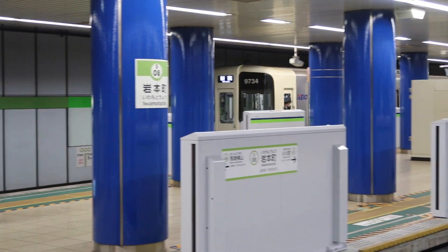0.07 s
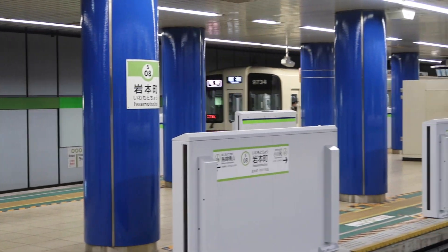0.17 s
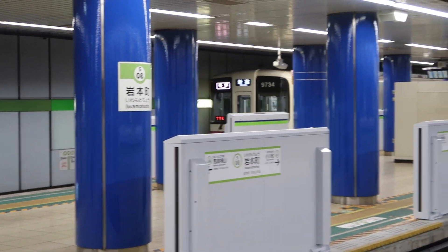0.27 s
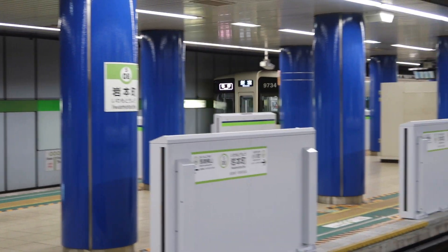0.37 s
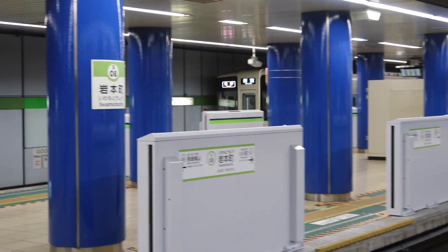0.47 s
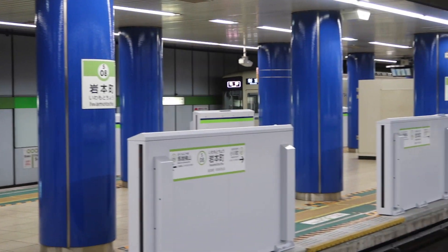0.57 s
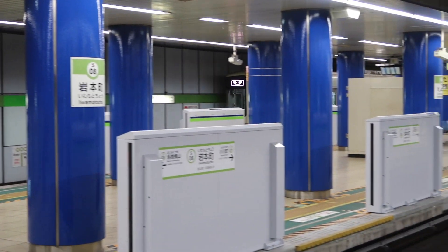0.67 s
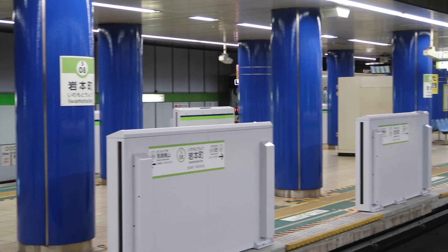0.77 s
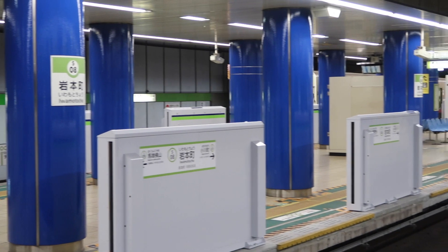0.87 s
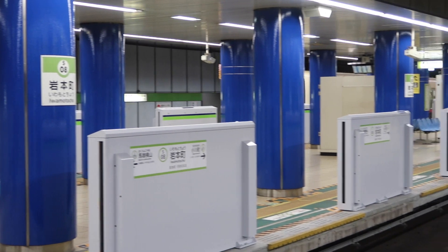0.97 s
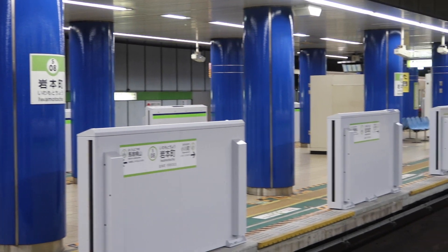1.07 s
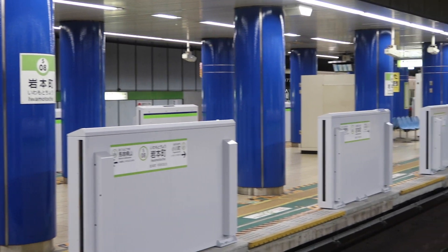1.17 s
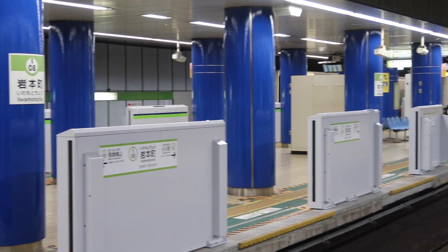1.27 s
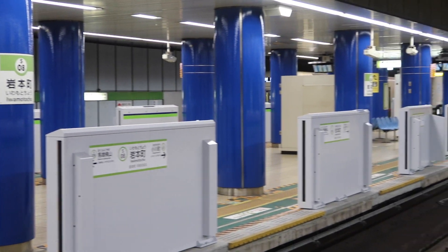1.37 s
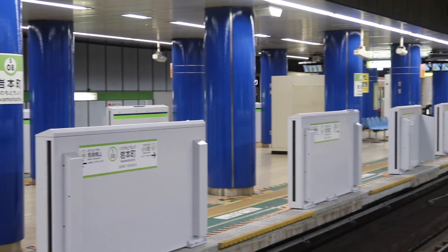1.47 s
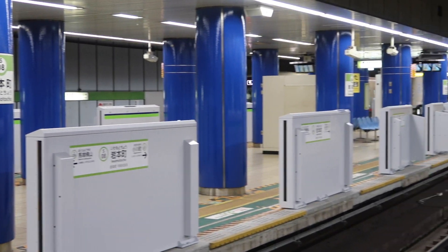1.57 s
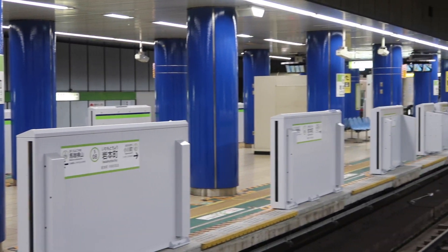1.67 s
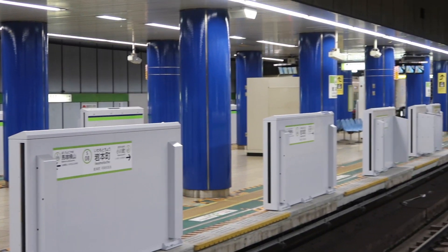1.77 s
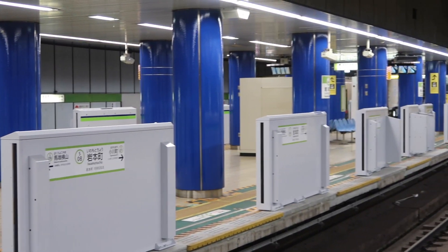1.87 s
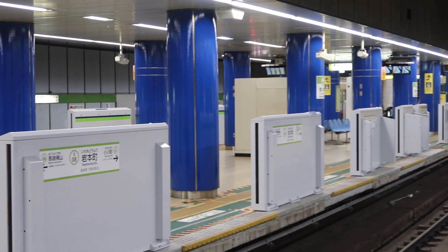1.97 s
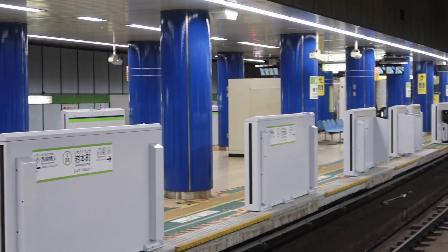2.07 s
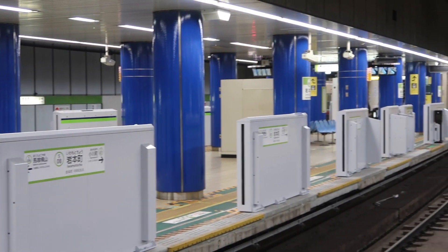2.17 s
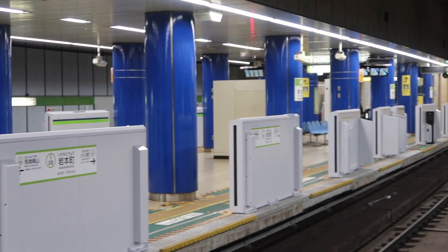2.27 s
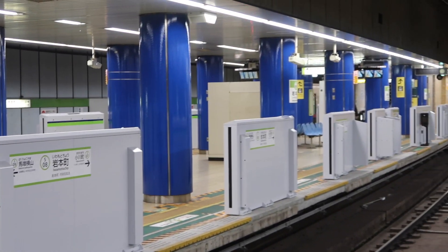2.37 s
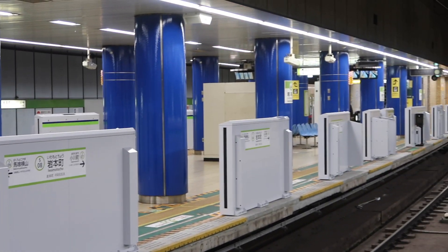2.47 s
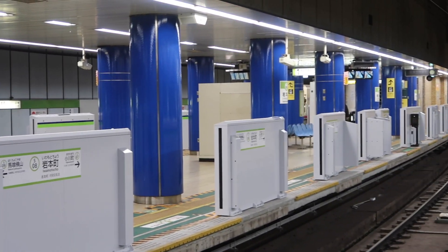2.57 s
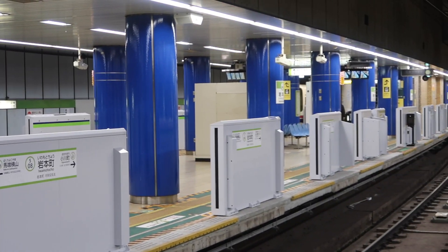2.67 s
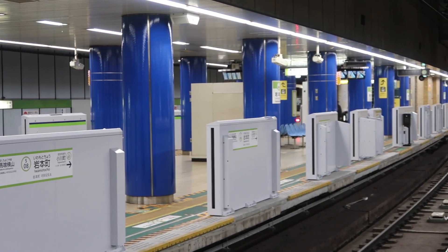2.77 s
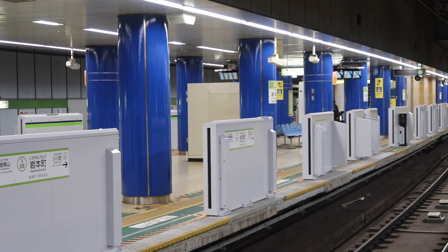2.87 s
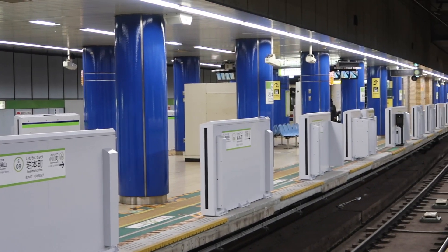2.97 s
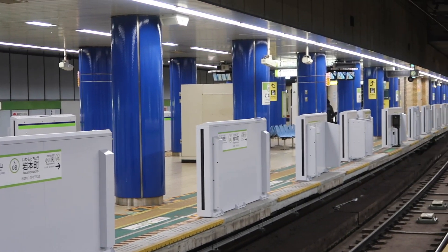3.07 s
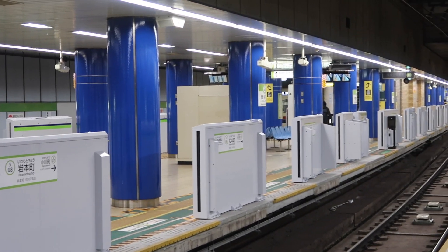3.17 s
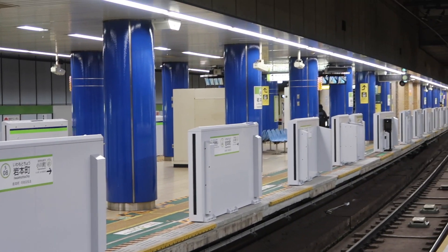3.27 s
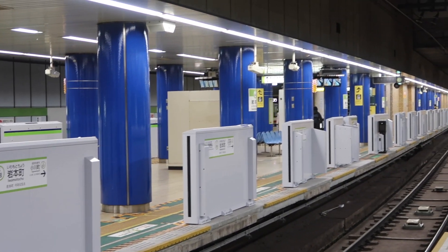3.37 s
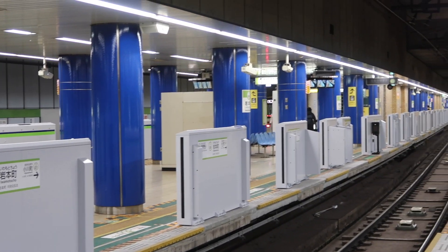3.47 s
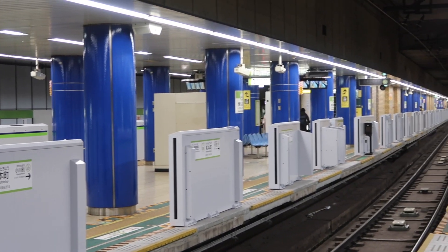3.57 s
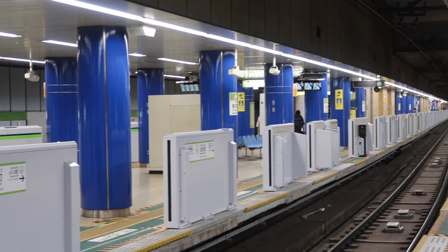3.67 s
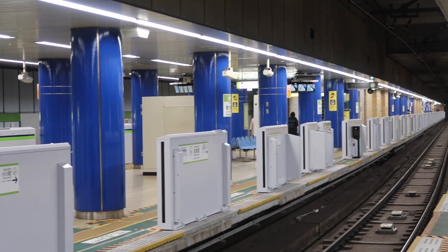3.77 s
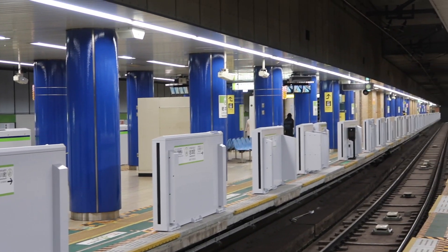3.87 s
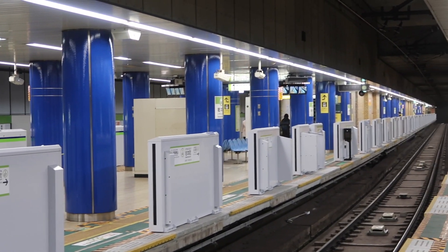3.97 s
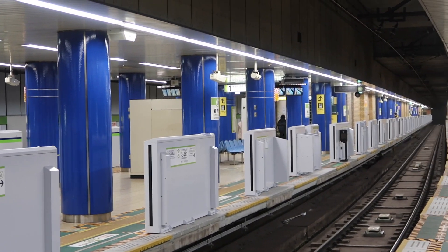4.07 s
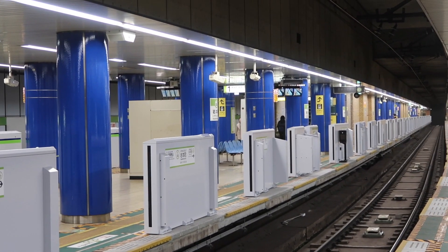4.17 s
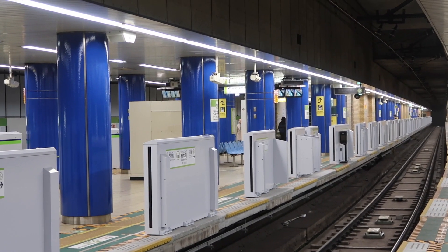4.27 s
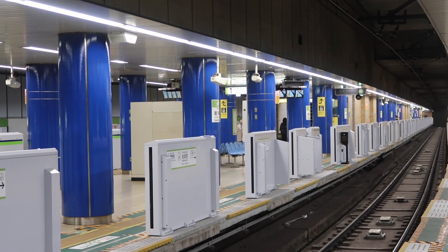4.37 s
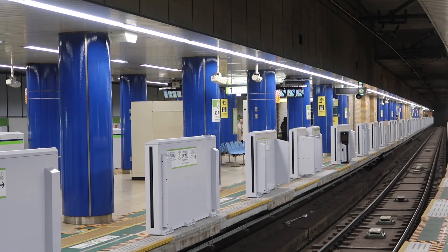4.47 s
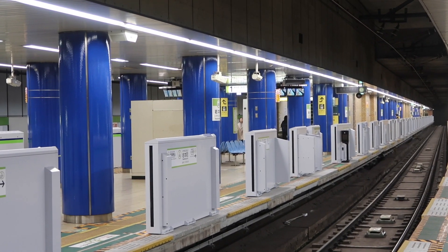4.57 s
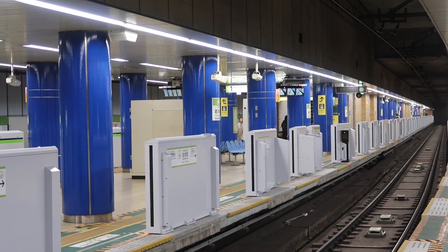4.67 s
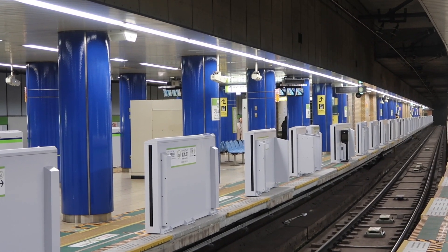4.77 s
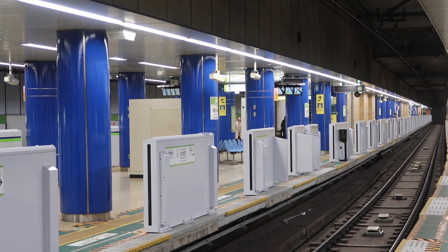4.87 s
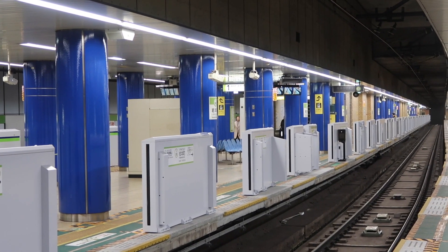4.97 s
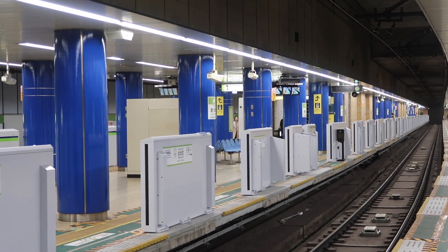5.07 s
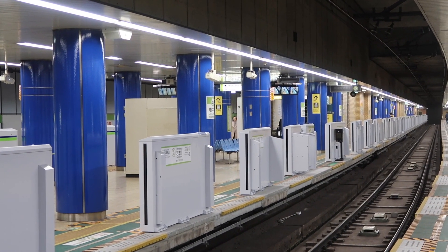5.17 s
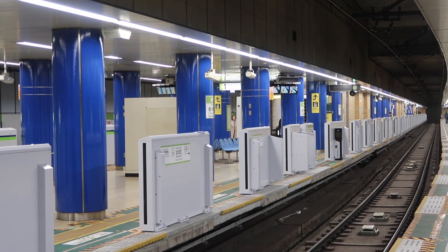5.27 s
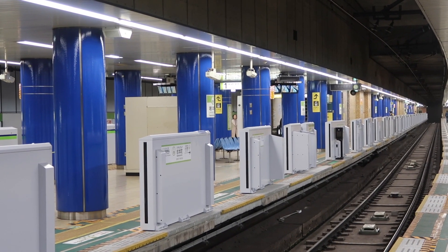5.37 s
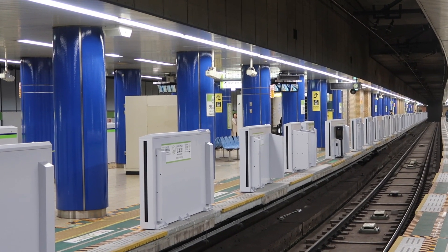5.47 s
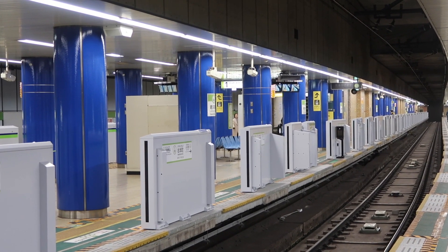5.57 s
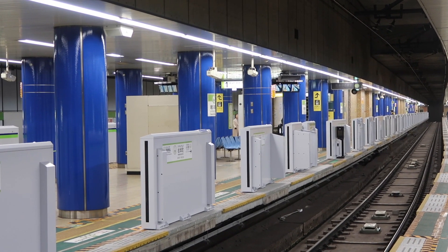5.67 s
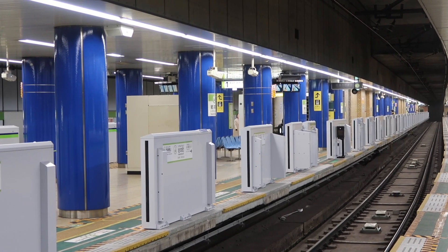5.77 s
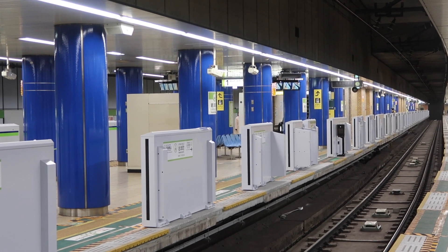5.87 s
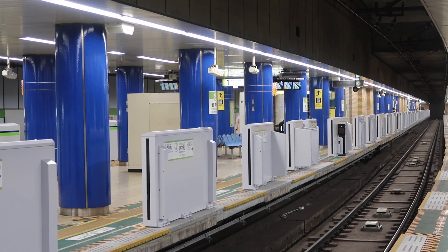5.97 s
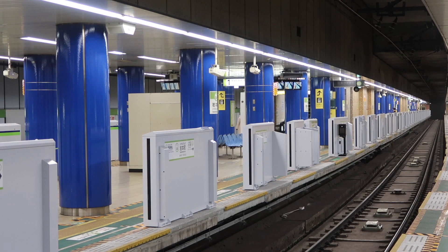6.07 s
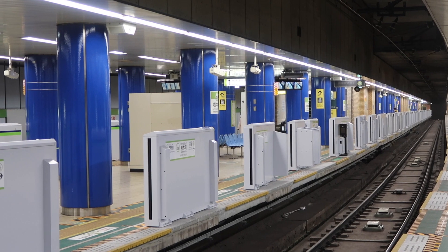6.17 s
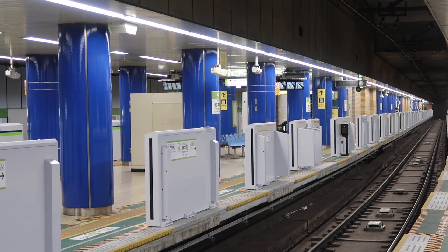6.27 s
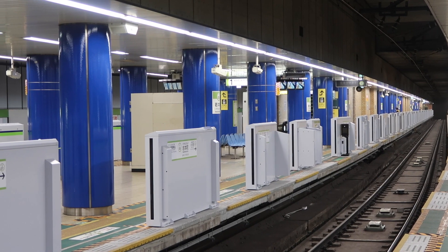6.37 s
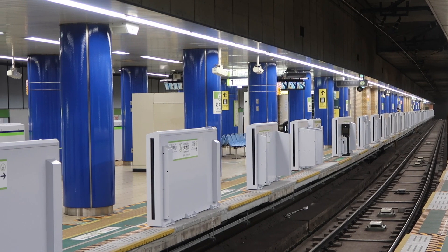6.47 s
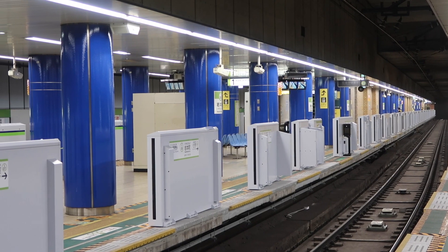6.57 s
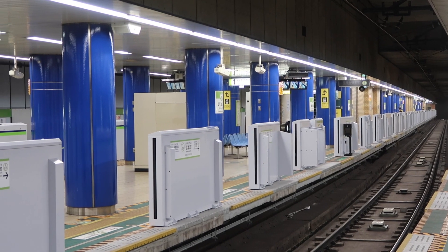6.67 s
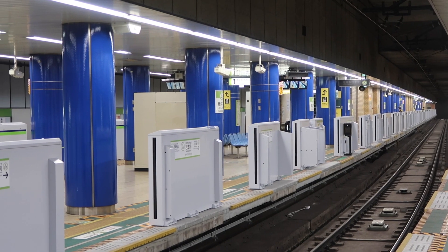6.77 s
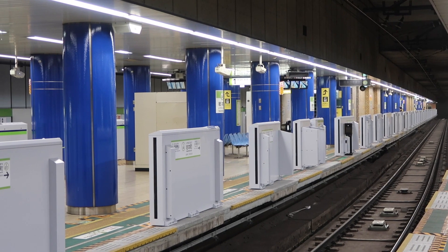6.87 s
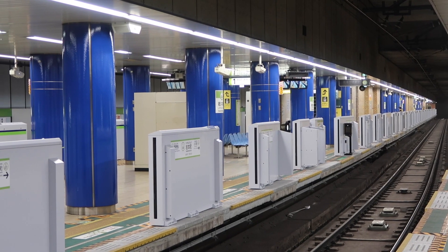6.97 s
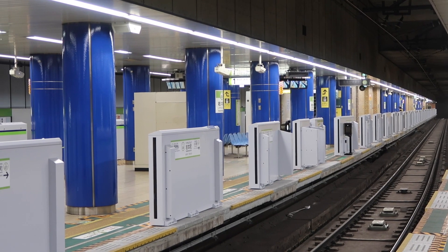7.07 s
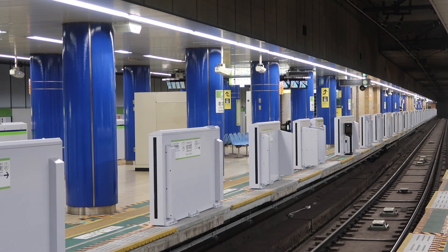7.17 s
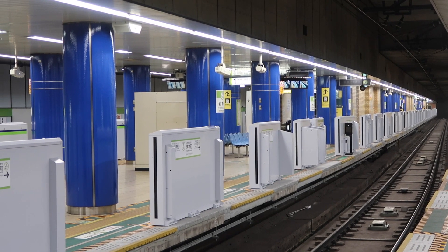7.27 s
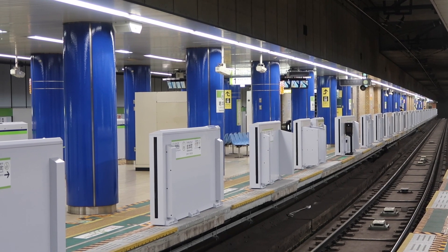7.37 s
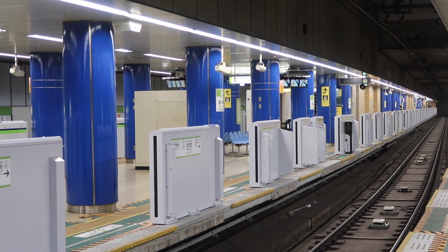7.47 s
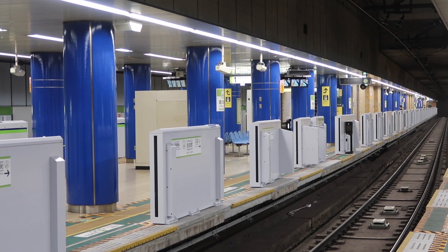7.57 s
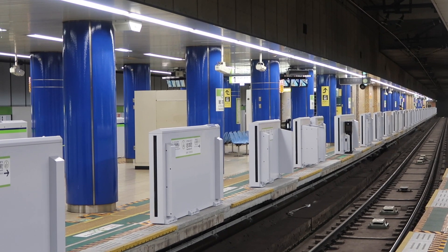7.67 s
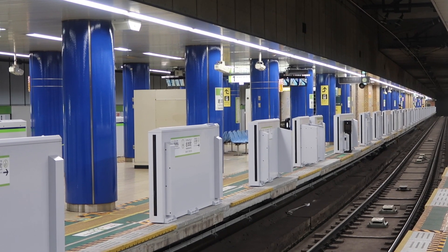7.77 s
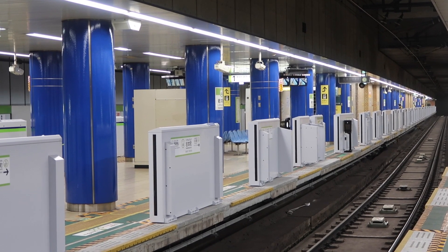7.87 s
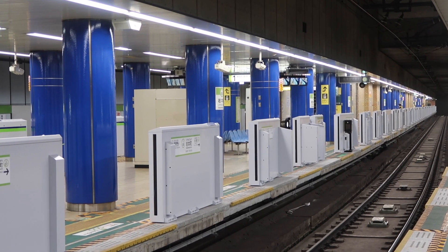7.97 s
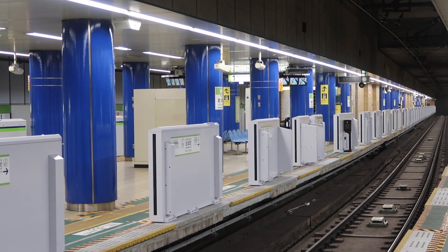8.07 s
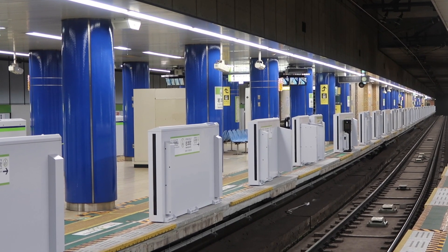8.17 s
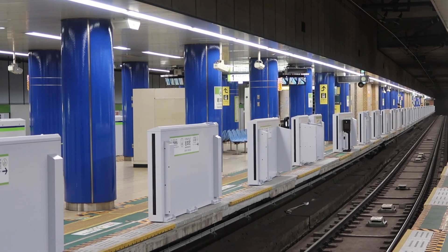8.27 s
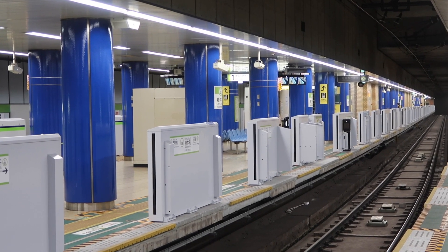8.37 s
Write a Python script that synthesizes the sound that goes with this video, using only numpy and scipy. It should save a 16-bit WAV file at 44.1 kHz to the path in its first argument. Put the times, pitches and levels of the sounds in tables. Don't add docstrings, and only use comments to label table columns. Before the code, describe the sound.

Departing subway train rumbles and roars past joints, a sweeping electrical howl dies away, and rising motor whine recedes into echoing distance.

```python
import sys
import numpy as np
from scipy import signal
from scipy.fft import rfft, irfft, next_fast_len
from scipy.io import wavfile
from scipy.ndimage import uniform_filter1d

SR = 44100
rng = np.random.default_rng(int(sys.argv[2]) if len(sys.argv) > 2 else 0)


def how_loud(loudness_db):
    steps = np.asarray(loudness_db, float) / 20
    return 10 ** steps


def put_to_file(sound):
    columns = np.atleast_2d(sound).T
    safe = np.clip(columns, -1, 1)
    whole_steps = np.round(safe * 32767)
    wavfile.write(sys.argv[1], SR, whole_steps.astype(np.int16))


N = 370881
TIME = np.arange(N) / SR


def unit(x):
    return x / np.sqrt(np.mean(np.abs(x[0]) ** 2) + 1e-20)


def along(points, hz):
    f, v = np.transpose(points)
    return np.interp(np.log(hz + 1), np.log(f + 1), v)


def curves(rows):
    s, *cols = np.transpose(rows)
    return [np.interp(TIME, s, c) for c in cols]


def ramp(start_s, length_s):
    return np.clip((TIME - start_s) / length_s, 0, 1)


def filtered(x, response):
    m = next_fast_len(N + 8192)
    return irfft(rfft(x, m) * response(np.fft.rfftfreq(m, 1 / SR)), m)[..., :N]


def rush(response, patchy_db):
    z = signal.stft(rng.standard_normal((2, N)), nperseg=512)[2]
    field = uniform_filter1d(rng.standard_normal(z.shape[1:]), size=5, axis=0)
    field = uniform_filter1d(field, size=12, axis=1)
    pair = signal.istft(z * how_loud(patchy_db * field / field.std()), nperseg=512)[1][:, :N]
    return unit(filtered(pair, response))


def coloured(spectrum, patchy_db):
    return rush(lambda f: how_loud(along(spectrum, f)), patchy_db)


def flutter(blur_hz):
    knots = rng.standard_normal((4, 9000))
    z = np.array([np.interp(TIME * blur_hz, np.arange(len(k)), k) for k in knots])
    return unit(z[:2] + 1j * z[2:])


def blurred(hz, db, blur_hz, steady=0):
    wobble = np.sqrt(1 - steady) * flutter(blur_hz) + np.sqrt(steady)
    tone = np.exp(2j * np.pi * np.cumsum(hz + 0 * TIME) / SR)
    return how_loud(db) * np.sqrt(2) * np.real(wobble * tone)


def tunnel(pair, t60, wet):
    t = TIME[:SR]
    tail = rng.standard_normal((2, len(t))) * how_loud(-60 * t / t60)
    fade_in = np.sin(np.pi / 2 * ramp(0, .02)) ** 2
    echo = signal.fftconvolve(pair * fade_in, tail / np.linalg.norm(tail[0]), axes=1)[:, :N]
    return np.sqrt(1 - wet) * pair + np.sqrt(wet) * echo


def receding():
    # start_s, loudness_db, motor_pull_db
    train = [(0, -20, -9), (.35, -22.5, -7.5), (.5, -22, -4.5), (.7, -23.5, -1.5), (1.4, -24, -2.5),
             (1.8, -24.5, -0.6), (2.2, -25.5, 1), (2.5, -26, 2), (2.8, -26.5, 5.5), (3, -26.5, 2.5),
             (3.25, -27, 3), (3.5, -26.5, 0.5), (3.8, -26.5, -1), (4.2, -27.5, -1.5), (4.7, -29, 1),
             (5.3, -29.5, 0.5), (5.8, -30, 1.4), (6.1, -30, 0.5), (6.4, -31, 4), (6.65, -28.5, -2),
             (6.9, -30.5, -0.5), (7.4, -30.5, -2), (8, -32, -5), (8.41, -32, -1)]
    loud_db, pull_db = curves(train)
    return loud_db - loud_db[0], pull_db


def joint_swells():
    # middle_s, rumble_lift_db, body_lift_db
    joints = [(0.229, 1, 3.5), (.45, 2.5, 4.5), (.8, 6, 4), (1.17, 4.5, 4.5), (1.65, 2, -2.5),
              (2.04, 1.5, -1.5), (2.3, 0.5, -3), (2.661, 1.5, 4), (2.981, 4.5, 4), (3.3, 3.5, 1),
              (3.82, 0.5, -10), (4.2, 0.5, -2.5), (4.901, 4, 1.5), (5.298, 2, -4.5), (5.85, 3, -0.5),
              (6.3, 3.5, -3), (6.7, -1.5, 3.5), (7.45, 3.5, -3), (8.17, 4.5, -2.5)]
    t = TIME[::100]
    swell_s = 0.2
    swells_db = sum(np.outer(lifts_db, np.exp(-((t - s) / swell_s) ** 2)) for s, *lifts_db in joints)
    return curves(np.column_stack([t, *swells_db]))


def station():
    # pitch_hz, level_db
    vent = [(8, -120), (16, -34), (25, -17), (32, -13), (42, -3), (55, 0), (70, -4), (110, -25),
            (200, -120)]
    return how_loud(-42) * coloured(vent, patchy_db=.5)


def case_tick(peak_db):
    # pitch_hz, level_db, decay_s (time to fall 60 dB)
    case = [(2800, 3, .02), (3500, 2, .02), (4100, 0, .016), (4700, -1, .016), (5700, -4, .012),
            (7000, 0, .012), (8500, 3, .01), (11500, -3, .01), (13800, -24, .008)]
    t = TIME[:SR // 20]
    ring = sum(how_loud(db - 60 * t / t60) * np.sin(2 * np.pi * hz * t) for hz, db, t60 in case)
    ring = ring * (1 - np.exp(-t / .001))
    noise = uniform_filter1d(rng.standard_normal(len(t) + 1), size=4)
    noise = np.diff(uniform_filter1d(noise, size=3))
    ring = ring + how_loud(12 - 60 * t / .06) * noise
    return how_loud([[peak_db - 7], [peak_db - 13]]) * ring


def camera():
    # pitch_hz, level_db
    capsule = [(1200, -120), (2500, -19.5), (4500, -3), (6000, -4.5), (8000, -7.5), (9500, -7), (10500, -8),
               (11400, -9), (12300, -13), (13500, -21), (14500, -22), (16000, -120)]
    # pitch_hz, level_db
    capsule_apart = [(1200, -120), (2500, -18.5), (4500, -5), (7000, -7), (9000, -3), (10800, -4),
                     (12200, -3.5), (13500, -16.5), (14500, -15), (16000, -120)]
    # pitch_hz, level_db
    whistle = [(13006, -88)]
    # start_s, peak_db
    tick = [
        (7.734, -38),
    ]
    common = how_loud(-70) * coloured(capsule, patchy_db=.5)[0]
    apart = how_loud(-69) * coloured(capsule_apart, patchy_db=.5)[0]
    gain_creep_db = 4 * (ramp(.5, 4) - .7)
    out = np.array([common + apart, common - apart]) * how_loud(gain_creep_db)
    for hz, db in whistle:
        out += blurred(hz, db, blur_hz=25)[0]
    for s, db in tick:
        sound = case_tick(db)
        start = round(s * SR)
        out[:, start:start + sound.shape[1]] += sound
    return out


def air_puff():
    start_s, rise_s, hold_s, fall_s = 6.4, .08, .13, .3
    blow = ramp(start_s, rise_s) - ramp(start_s + rise_s + hold_s, fall_s)
    return how_loud(-60) * blow * rush(lambda f: np.exp(-np.log(f / 3000 + 1e-6) ** 2 / .5), patchy_db=1)


def low_rumble():
    # pitch_hz, level_db
    rumble = [(13, -45), (22, -24), (81, 2.5), (99, -1), (135, -11.5), (180, -44), (300, -120)]
    # pitch_hz, level_db
    body = [(50, -120), (90, -21), (120, 15), (140, 13.5), (175, 2.5), (230, -3), (290, -48), (480, -120)]
    away_db = receding()[0]
    rumble_lift_db, body_lift_db = joint_swells()
    out = how_loud(-24.5 + away_db + rumble_lift_db) * coloured(rumble, patchy_db=-1.0)
    out += how_loud(-29.5 + 0.74 * away_db + body_lift_db) * coloured(body, patchy_db=-1.5)
    return out + blurred(92.4, -21 + 2.4 * away_db + rumble_lift_db, blur_hz=30.13)


def rolling_roar():
    # pitch_hz, level_db
    roar = [(88, -28), (150, -5.5), (195, -5), (298, -3), (386, -2.5), (592, -4.5), (1020, -8),
            (1360, -18.5), (1640, -21), (1800, -25.5), (2340, -52), (3960, -120)]
    # pitch_hz, level_db
    hiss = [(500, -120), (900, -37), (1380, -0.5), (1650, -6), (2000, -7), (2400, -10), (3000, -15),
            (4000, -23.5), (5000, -32), (6000, -38), (8000, -46.5), (14000, -120)]
    away_db = receding()[0]
    hiss_noise = coloured(hiss, patchy_db=1.7)
    sheen = filtered(hiss_noise[:, ::-1], lambda f: 1 / (1 + (2570 / (f + 1)) ** 4))
    out = how_loud(-20 + 0.87 * away_db) * coloured(roar, patchy_db=0.85)
    out += how_loud(-35 + away_db) * hiss_noise
    out += how_loud(-35 + 1.8 * away_db) * sheen
    return out + blurred(1966, -45.5 + 0.41 * away_db, blur_hz=328)


def step_ring():
    # pitch_hz, width_hz, level_db
    resonances = [(1329, 130, 0.5), (1410, 110, -6)]
    start_s, rise_s, hold_s = 0.38, 0.075, 0.94
    step, end_s = ramp(start_s, rise_s), start_s + hold_s
    ring = rush(lambda f: sum(how_loud(db) / (1 + ((f - hz) / width * 2) ** 4) for hz, width, db in resonances),
                patchy_db=-0.2)
    ring_db = -33 - 6.5 * ramp(end_s, 0.6) - 2 * np.maximum(TIME - end_s, 0)
    moan = blurred(992, -33, blur_hz=217.3)
    return step * how_loud(ring_db) * ring + (1 - step) * moan


def rising_howl():
    climb_hz_per_s, sweep_s = 1020, 1.1
    hz = 1902 + climb_hz_per_s * np.minimum(TIME, sweep_s + 0.55 * (TIME - sweep_s))
    low_db = -40 - 3 * TIME - 24.5 * np.maximum(TIME - sweep_s + 0.11, 0)
    high_db = -40 - 3.5 - 34 * np.maximum(TIME - .3, 0)
    howl = blurred(hz, low_db, blur_hz=638)
    howl += blurred(hz + 1163 - 150 * TIME, high_db, blur_hz=553)
    settled_hz = 3152 - 130 * np.minimum(TIME, 4)
    return howl + ramp(0.87, .4) * blurred(settled_hz, -45 - 2.5 * TIME, blur_hz=898)


def motor_whines():
    # multiple of the mesh rate, blur_hz, start_level_db, fade (dB lost per dB of loudness lost)
    whines = [(.884, 34.01, -34.5, 0.85), (1, 42.03, -30.5, 1.0), (1.12, 90.07, -25, 3.5),
              (1.275, 40.04, -33.5, 0.96), (1.993, 50.44, -46.5, 1.45), (2.36, 59.7, -31.5, 2.5),
              (2.655, 80, -26, 2.5), (3.32, 90.14, -38, 1.2)]
    # pitch_hz, width_hz, lift_db
    passage = [(273.2, 27.6, 11), (312.5, 5.9, 4), (389, 46, 10), (352, 21, 5.5), (433.7, 40, 3.5),
               (465, 35, -7), (522, 54, 11.5), (626, 60, 9), (678, 45, 7.5), (752, 70, 9), (821, 80, -11.5),
               (847, 99, 8), (977, 44, 6), (1075, 110, 3), (1140, 65, 12)]
    mesh_hz = 239.1 + 24.6 * TIME - .24 * TIME ** 2
    away_db, pull_db = receding()
    out = 0
    for multiple, blur_hz, db, fade in whines:
        out = out + blurred(multiple * mesh_hz, db + fade * away_db + pull_db, blur_hz, steady=.1)

    def lift(f):
        lift_db = sum(db / (1 + ((f - hz) / width * 2) ** 2) for hz, width, db in passage)
        return how_loud(lift_db) / (1 + (f / 1270) ** 20)

    return filtered(out, lift)


def scene():
    # pitch_hz, side_minus_mid_db
    apart = [(40, -48), (96, -52.5), (150, -34), (240, -25.5), (390, -19.5), (620, -20), (980, -18),
             (1570, -13.5), (2500, -9.5), (4000, -3), (7000, 2.5)]
    wheels = low_rumble() + rolling_roar() + step_ring() + air_puff()
    drive = tunnel(motor_whines() + rising_howl(), t60=1.3, wet=.25)
    mid, other = station() + wheels + drive
    side = filtered(other, lambda f: how_loud(along(apart, f)))
    return np.array([mid + side, mid - side]) + camera()


def roll_off(x):
    return signal.sosfilt(signal.butter(12, 14900, fs=SR, output="sos"), x)


def record(dry):
    return roll_off(dry)


dry = scene()
out = record(dry)
put_to_file(out)
```